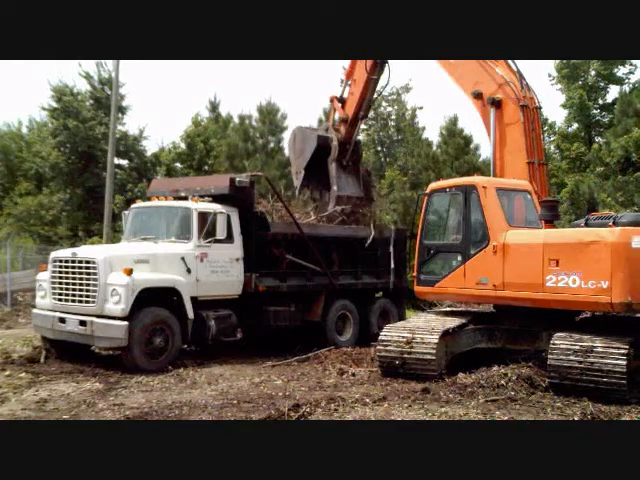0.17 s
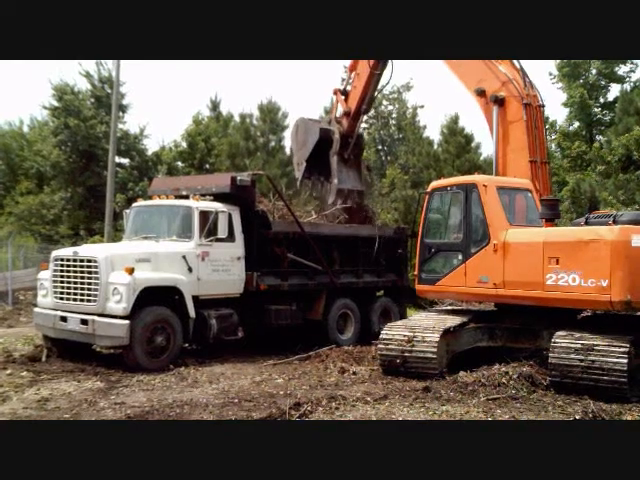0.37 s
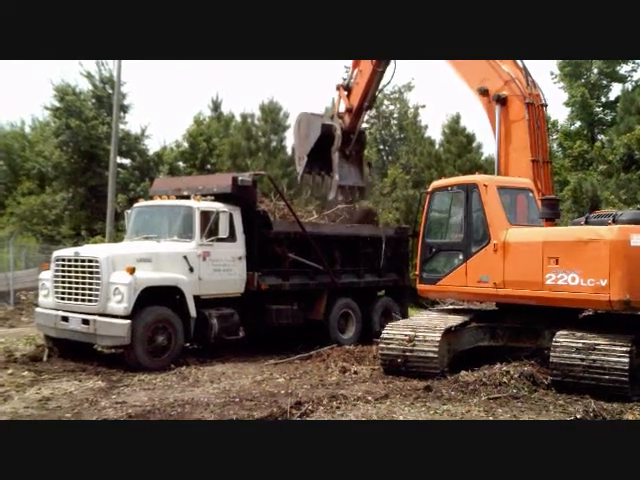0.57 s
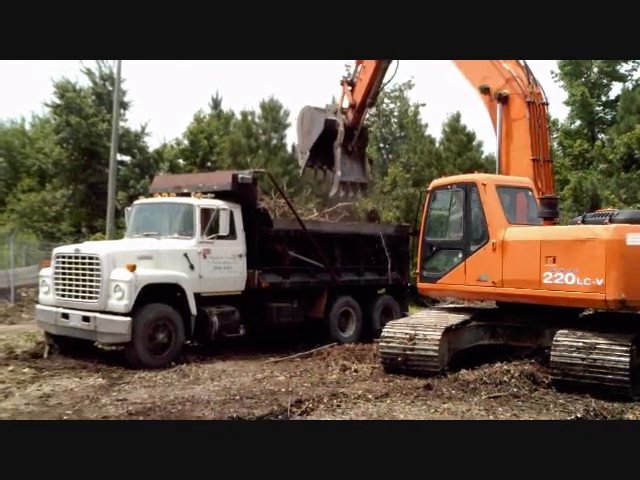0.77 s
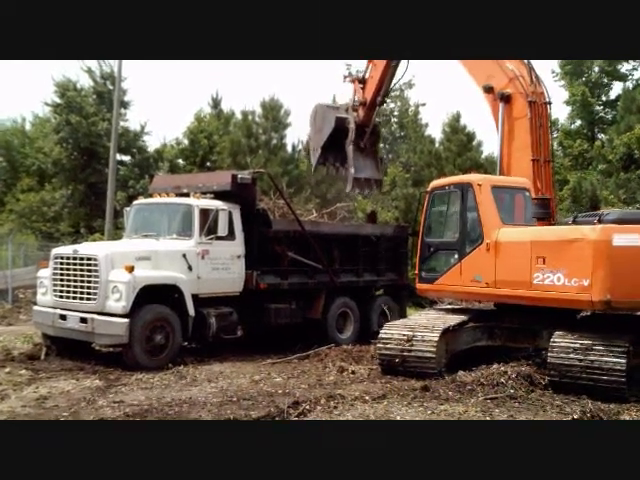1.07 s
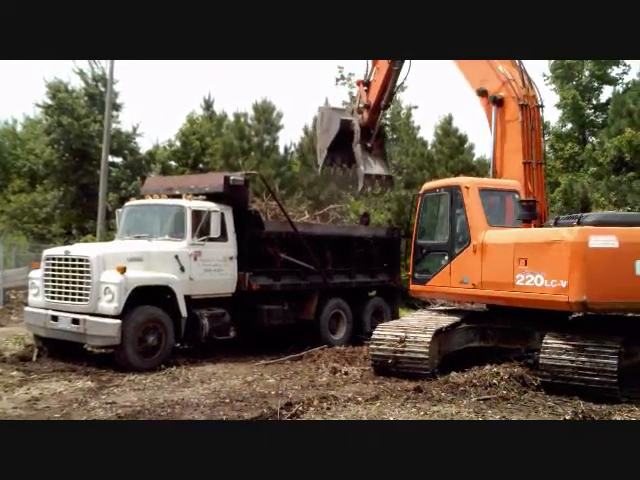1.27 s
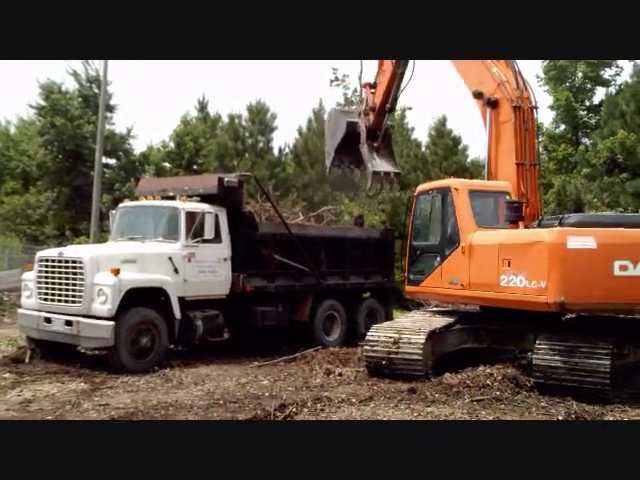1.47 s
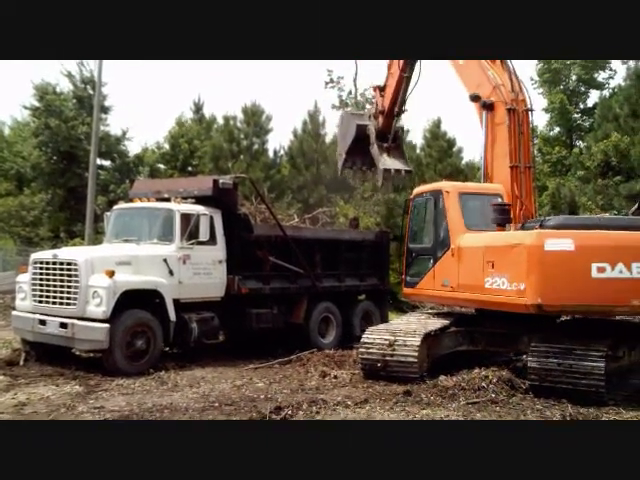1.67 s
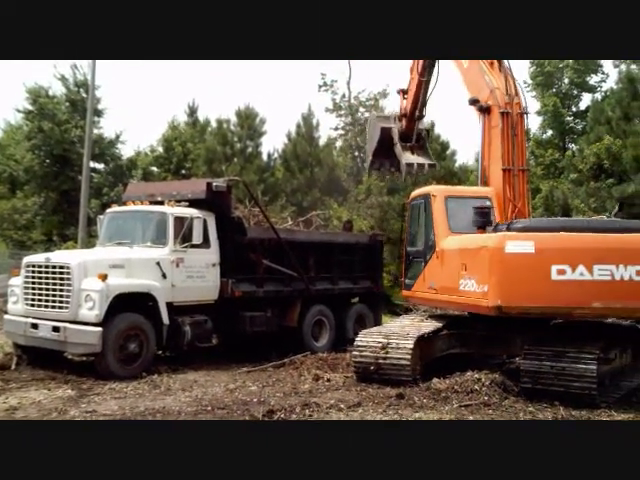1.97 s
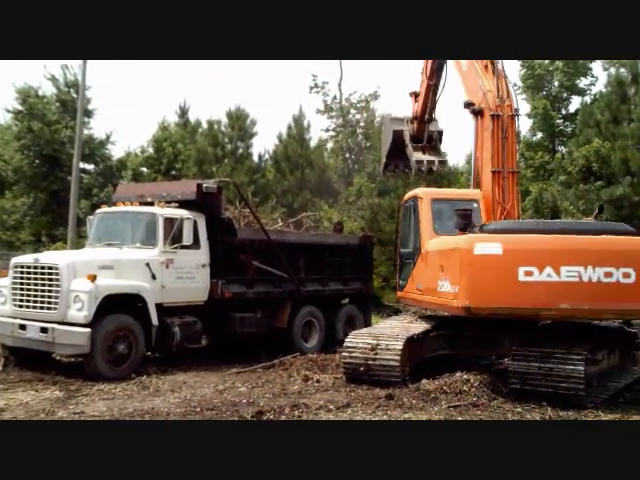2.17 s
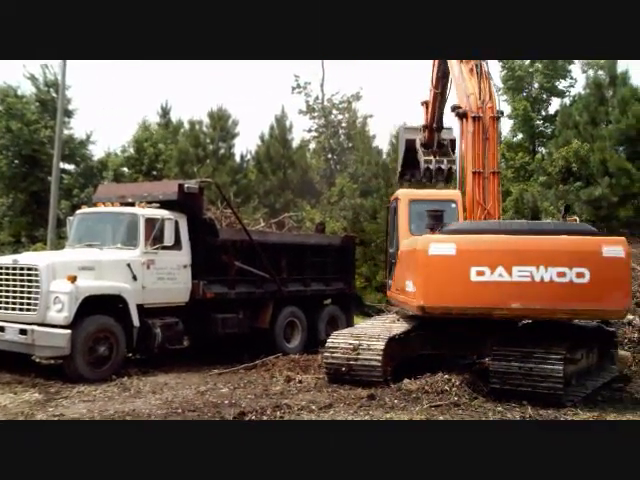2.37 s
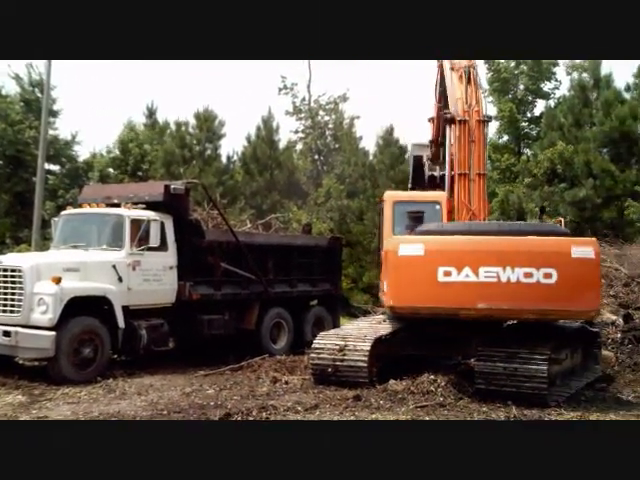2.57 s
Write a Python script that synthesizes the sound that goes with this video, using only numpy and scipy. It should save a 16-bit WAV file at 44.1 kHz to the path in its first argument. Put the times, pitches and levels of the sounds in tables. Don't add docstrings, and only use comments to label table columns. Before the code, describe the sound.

Excavator bucket clanks and bongs hollowly as it shakes out over a truck, diesel engine roaring steadily

```python
import sys
import numpy as np
from scipy import signal
from scipy.fft import rfft, irfft
from scipy.io import wavfile
from scipy.ndimage import uniform_filter1d

SR = 44100
rng = np.random.default_rng(int(sys.argv[2]) if len(sys.argv) > 2 else 0)


def transcribe(signal):
    frames = np.atleast_2d(signal).T
    limited = np.clip(frames, -1, 1)
    pcm = np.round(limited * 32767).astype(np.int16)
    wavfile.write(sys.argv[1], SR, pcm)


def rack_gain(trim_db):
    fader = np.asarray(trim_db, float)
    return 10 ** (fader / 20)


N = 120393
T = np.arange(N) / SR

# time_s, crank_hz
CRANK_SPEED = [(0, 30.48), (.25, 30.33), (.55, 30.15), (1.2, 30.17), (1.9, 30.12), (2.2, 30.1), (2.5, 30.4),
               (2.73, 30.7)]
# crank_multiple, level_db
ENGINE_ORDERS = [(3, -45.5), (4.5, -48), (5, -44), (6, -48), (7, -46.5), (7.5, -54), (10.5, -52.5),
                 (12, -48.5), (15, -51), (22, -62.5), (24, -53.5)]
# time_s, effort_db
ENGINE_LOAD = [
    (0, 0.5),
    (.4, 0.5),
    (1.4, 0.86),
    (1.8, 0.5),
    (2.3, 0.1),
    (2.73, 3.5),
]
# freq_hz, density_db
ROAR_SPECTRUM = [(25, -29.5), (35, -14.5), (52, -9), (110, -5.5), (300, -7), (500, -11.5), (800, -7.5),
                 (1500, -19.5)]
# freq_hz, density_db
CLATTER_SPECTRUM = [(1500, -5), (1900, -6), (3300, -3), (3600, -7), (4700, -10.5), (5500, -12),
                    (7800, -15.5)]
# freq_hz, width_hz, level_db
COWL_MODES = [(865, 35, -45), (1368, 164, -44), (2528, 200, -55), (4150, 480, -60.5), (6320, 1100, -60.5)]
# firing_multiple, level_db
TRUCK_ORDERS = [(1, -50), (2, -45.5), (3, -48.5)]
# start_s, end_s, piston_rate_multiple
VALVE_OPENINGS = [(-.1, .47, 3), (.47, .69, 3), (.85, 1.4, 3), (1.88, 2.04, 3), (.16, .34, 1), (.56, .8, 1),
                  (1.0, 1.2, 1), (2.14, 2.53, 1), (1.6, 2.73, 2), (.25, 1.95, 12), (1.13, 1.8, 12),
                  (1.13, 1.42, 12), (0, .6, 2)]
WHINE_LEVELS_DB = [-35, -33, -54, -40.5, -38.5, -37, -38.5, -37, -48, -61, -56.5, -55.5, -48]
# start_s, level_db, hold_s
SHELL_BLOWS = [(0.027, -29.5, 0.0081), (0.065, -32, 0.005), (0.232, -35.5, 0.017), (0.456, -31, 0.055),
               (0.505, -28, 0.012), (0.608, -29.5, 0.011), (0.724, -21, 0.07), (0.802, -30.5, 0.015),
               (0.89, -30, .03), (0.926, -27, 0.06), (1.003, -22, 0.024), (1.037, -29.5, 0.04),
               (1.088, -24, 0.061), (1.12, -27, 0.018), (1.156, -26, .035), (1.201, -27.5, 0.044),
               (1.275, -28.5, 0.016), (1.344, -32.5, 0.014), (1.45, -31, 0.015), (2.529, -33.5, 0.043),
               (2.56, -31, 0.045), (2.657, -37.5, 0.074)]
# freq_hz, level_db, t60_s
SHELL_MODES = [(548, -18, 0.45), (582, -7, 0.12), (618.4, -5, 0.17), (651, -2.5, 0.15), (675, -4, .2),
               (745, -0.5, 0.071), (806.5, -1.5, 0.64), (843, -5, 0.24), (872, -6, 0.066),
               (1057, -23, 0.13), (1061, -8, 0.17), (1333, -11.5, 0.012), (1366, 1, 0.036),
               (1420, -23, 0.16)]
# start_s, level_db, panel_hz, t60_s
BED_THUDS = [(0.074, -24.5, 189.2, 0.45), (0.257, -28, 216, 0.36), (.495, -27.5, 159, 0.12),
             (0.884, -24.5, 366, 0.096), (.665, -26, 270, .2), (0.732, -26, 278, 0.47),
             (.765, -23, 319.6, 0.24), (.775, -29, 82.4, .3), (0.946, -25.5, 315, 0.18),
             (1.008, -23.5, 381.4, 0.34), (1.061, -26, 308, 0.2), (1.11, -25.5, 196, 0.17),
             (1.145, -20, 340.4, 0.19), (1.209, -24, 331, 0.18), (1.258, -26.5, 248, 0.17),
             (1.309, -27.5, 315, 0.14), (1.012, -24, 327, 0.17), (1.491, -29.5, 371, 0.22),
             (2.55, -30.5, 345, 0.17), (2.679, -39, 228.5, 0.2), (2.69, -30, 354, 0.3)]
# start_s, level_db, hold_s, tilt_db_per_octave
PIN_CLANKS = [(0.503, -45, 0.006, 20), (0.7182, -30.5, 0.052, 6), (0.794, -36.5, 0.032, -3),
              (0.931, -41.5, 0.059, 1), (1.007, -32.5, 0.025, 5), (1.088, -42.5, 0.076, 8),
              (1.123, -32.5, 0.028, 5), (1.146, -31.5, 0.04, 4.5), (1.204, -39, 0.056, 7),
              (1.272, -43.5, 0.027, 9), (1.342, -44.5, 0.012, 7.5), (2.547, -39, 0.016, 9.5),
              (2.68, -47, 0.041, 8.5),
              (.656, -45, .05, -2),
    (.866, -44, .006, -3),
    (.203, -47, .005, 10.5),
    (.233, -43, .012, 9),
    (.509, -37, .008, 7),
    (1.449, -38.5, .025, 0),
    (2.175, -42, .006, 9),
]
# freq_hz, level_db, t60_s
PIN_MODES = [(1844, -3, 0.021), (1947, -3, 0.031), (2277, 1, 0.023), (2432, 2, 0.027), (2580, -9.5, 0.11),
             (2720, -8.5, 0.01), (3270, -7.5, 0.037), (3760, -18, 0.045), (3910, -13.5, 0.03),
             (4245, -7, 0.021)]
# freq_hz, level_db
CRACK_SPECTRUM = [(1200, 16), (1650, 4.5), (2200, -21.5), (2900, -8.5), (4350, -22.5), (4700, -17),
                  (5900, -14.5), (7600, -26.5)]
# start_s, level_db, centre_hz
SHELL_KNOCKS = [(.6555, -18.5, 680), (.6717, -21, 680), (.682, -25, 680), (.6952, -24, 680),
                (.7231, -21, 680), (.234, -29, 740), (.506, -28, 780), (.517, -29, 780), (.739, -24, 640),
                (.75, -24, 720), (.762, -23, 740), (.774, -25, 620), (.811, -25, 700), (.889, -30, 720),
                (.931, -30, 680), (.968, -26, 760), (1.008, -27, 660), (1.014, -22, 660), (1.034, -27, 740),
                (1.046, -25, 700), (1.065, -24, 640), (1.084, -26, 610), (1.117, -25, 690),
                (1.128, -26, 740), (1.1455, -18, 650), (1.16, -25, 600), (1.174, -24, 700),
                (1.187, -26, 620), (1.273, -24, 635), (1.351, -30, 760), (1.45, -33, 700),
                (1.762, -33, 700), (2.548, -30, 760), (2.575, -31, 680)]
# freq_hz, level_db, t60_s
KNOCK_MODES = [(528, -12, .08), (612, -6, .12), (680, 0, .13), (727, -8, .1), (812, -4, .09),
               (862, -12, .06), (1350, -17, .05), (1500, -14, .05), (2330, -22, .04)]

T60_WIDTH = np.log(1000) / np.pi


def evened(x):
    return x / np.sqrt(np.mean(x ** 2) + 1e-20)


def loudest(x):
    return x / np.sqrt(uniform_filter1d(x ** 2, 441).max())


def curve(points):
    return np.interp(T, *np.transpose(points))


def add(mix, start_s, sound):
    part = mix[max(round(start_s * SR), 0):][:len(sound)]
    part += sound[:len(part)]


def band(x, low_hz, high_hz):
    return signal.lfilter(*signal.butter(2, [low_hz, high_hz], "bandpass", fs=SR), x)


def coloured(x, points):
    f, level_db = np.transpose(points)
    hz = np.fft.rfftfreq(len(x), 1 / SR) + 1
    octaves_outside = np.maximum(np.log2(f[0] / hz), 0) + np.maximum(np.log2(hz / f[-1]), 0)
    gain_db = np.interp(np.log(hz), np.log(f), level_db) - 35 * octaves_outside
    return irfft(rfft(x) * rack_gain(gain_db), len(x))


def ring(x, hz, width_hz):
    r = np.exp(-np.pi * width_hz / SR)
    w = 2 * np.pi * hz / SR
    return signal.lfilter([np.sin(w)], [1, -2 * r * np.cos(w), r * r], x)


def slow(hz):
    noise = uniform_filter1d(rng.standard_normal(N), 800)
    return evened(signal.lfilter([1], [1, -np.exp(-2 * np.pi * hz / SR)], noise))


def tone(turns, level_db, waver_db=0.5, waver_hz=3.3):
    level = np.sqrt(2) * rack_gain(level_db + waver_db * slow(waver_hz))
    drift_turns = 0.018 * slow(waver_hz)
    return level * np.sin(2 * np.pi * (turns + rng.random() + drift_turns))


def rattle(hold_s):
    rate_per_s, t60_s, rise_s = 2200, 0.24, 0.0015
    clump_db, sag_db, settle_db = 1.5, -6, -7
    chance, height = rng.random((16000, 2)).T
    t = np.arange(16000) / SR
    clicks = (chance < rate_per_s / SR) * (2 * height - 1)
    clumps = evened(uniform_filter1d(height - 0.5, 300))
    after_s = np.maximum(t - hold_s, 0)
    level_db = clump_db * clumps + sag_db * np.minimum(t / hold_s, 1)
    level_db += settle_db * np.minimum(after_s / 0.002, 1) - 60 * after_s / t60_s
    return clicks * np.minimum(t / rise_s, 1) * rack_gain(level_db)


def struck(modes, drive, tilt_db):
    out = np.zeros(len(drive))
    for hz, level_db, t60_s in modes:
        uneven_db, detune = 2 * rng.standard_normal(), 0.013 * rng.standard_normal()
        mode = evened(ring(drive, hz * (1 + detune), T60_WIDTH / t60_s))
        out += rack_gain(level_db + uneven_db + tilt_db * np.log2(hz / 2000)) * mode
    return out


def engine(turns):
    roar_db, roar_gate = -35, 0.052
    clatter_db, clatter_gate, clatter_load = -50, 0.28, 0.23
    firings = 3 * turns
    strength = rack_gain(3.6 * rng.standard_normal(400))[firings.astype(int)]
    puff = evened(strength * np.exp(-(firings % 1)))
    load_db = curve(ENGINE_LOAD)
    roar = evened(coloured((1 + roar_gate * puff) * rng.standard_normal(N), ROAR_SPECTRUM))
    orders = sum(tone(k * turns, db) for k, db in ENGINE_ORDERS)
    clatter = (1 + clatter_gate * puff) * rng.standard_normal(N)
    cowl = sum(rack_gain(db) * evened(ring(clatter, hz, width_hz)) for hz, width_hz, db in COWL_MODES)
    hiss = rack_gain(clatter_db) * evened(coloured(clatter, CLATTER_SPECTRUM))
    return rack_gain(load_db) * (rack_gain(roar_db) * roar + orders) + rack_gain(clatter_load * load_db) * (hiss + cowl)


def ground_dip(x):
    dip_hz, dip_q, depth = 495, 9, 0.45
    return x - depth * signal.lfilter(*signal.iirpeak(dip_hz, dip_q, SR), x)


def truck():
    firing_hz = 34.53
    return sum(tone(k * firing_hz * T, db) for k, db in TRUCK_ORDERS)


def pump(turns):
    pistons, valve_s = 9, 0.04
    out = np.zeros(N)
    for (start_s, end_s, k), level_db in zip(VALVE_OPENINGS, WHINE_LEVELS_DB):
        opening = np.clip(np.minimum(T - start_s, end_s - T) / valve_s + 0.5, 0, 1)
        out += opening * tone(k * pistons * turns, level_db, waver_db=1.6, waver_hz=10)
    return out


def shell():
    out = np.zeros(N)
    for start_s, level_db, hold_s in SHELL_BLOWS:
        bong = band(struck(SHELL_MODES, rattle(hold_s), 0), 610, 1200)
        add(out, start_s, rack_gain(level_db) * loudest(bong))
    return out


def bed():
    spread = 0.0982
    out = np.zeros(N)
    for start_s, level_db, hz, t60_s in BED_THUDS:
        push = band(rattle(0.015), 0.47 * hz, 2.23 * hz)
        thud = np.zeros(len(push))
        for k in (-2.5, -1.3, 0, 1, 2.0):
            thud += evened(ring(push, hz * (1 + spread * k), T60_WIDTH / t60_s)) / (2 + abs(k))
        add(out, start_s, rack_gain(level_db) * loudest(thud))
    return out


def pins():
    crack_db = 2.5
    out = np.zeros(N)
    for start_s, level_db, hold_s, tilt_db in PIN_CLANKS:
        drive = rattle(hold_s)
        clank = band(struck(PIN_MODES, drive, tilt_db), 1500, 8160)
        crack = coloured(drive, [(hz, db + tilt_db * np.log2(hz / 2000)) for hz, db in CRACK_SPECTRUM])
        add(out, start_s, rack_gain(level_db) * (loudest(clank) + rack_gain(crack_db) * loudest(crack)))
    return out


def knocks():
    blow = band(np.pad(np.hanning(30), (0, 8000)), 480, 2600)
    out = np.zeros(N)
    for start_s, level_db, centre_hz in SHELL_KNOCKS:
        scale = centre_hz / 680
        knock = sum(rack_gain(db) * ring(blow, hz * scale, T60_WIDTH / t60_s) for hz, db, t60_s in KNOCK_MODES)
        add(out, start_s, rack_gain(level_db) * loudest(knock))
    return out


def yard(x):
    t60_s = 0.5
    taps = np.zeros(SR // 2)
    at = np.arange(300, SR // 2 - 22, 22)
    taps[at + rng.integers(0, 22, len(at))] = rng.choice([-1., 1.], len(at))
    taps *= rack_gain(-60 * T[:SR // 2] / t60_s)
    return signal.fftconvolve(x, taps / np.linalg.norm(taps))[:N]


def scene():
    turns = np.cumsum(curve(CRANK_SPEED)) / SR
    machines = ground_dip(engine(turns)) + truck() + pump(turns)
    blows = shell() + bed() + pins() + knocks()
    return (machines + blows + rack_gain(-5.5) * yard(blows))[None]


def roll_off(x):
    return signal.sosfilt(signal.butter(12, 8010, fs=SR, output="sos"), x)


def record(dry):
    edge_hz, offset = 7950, 0.0759
    lowpass = signal.firwin(401, edge_hz, window=("kaiser", 9), fs=SR)
    narrow = signal.oaconvolve(dry, lowpass[None], "same")
    return roll_off(narrow + offset)


dry = scene()
out = record(dry)
transcribe(out)
```